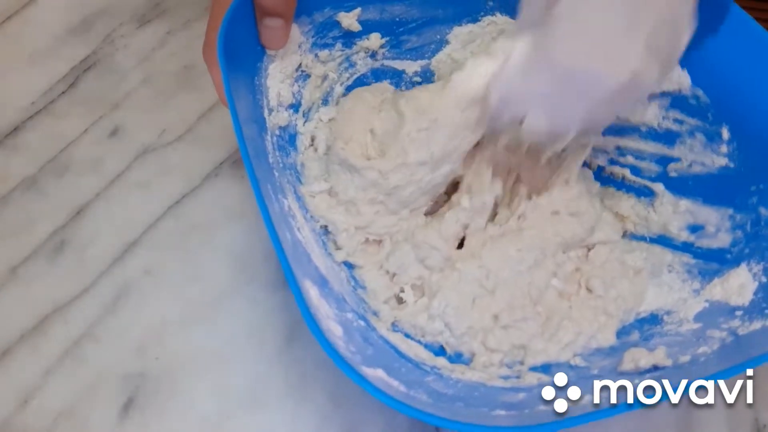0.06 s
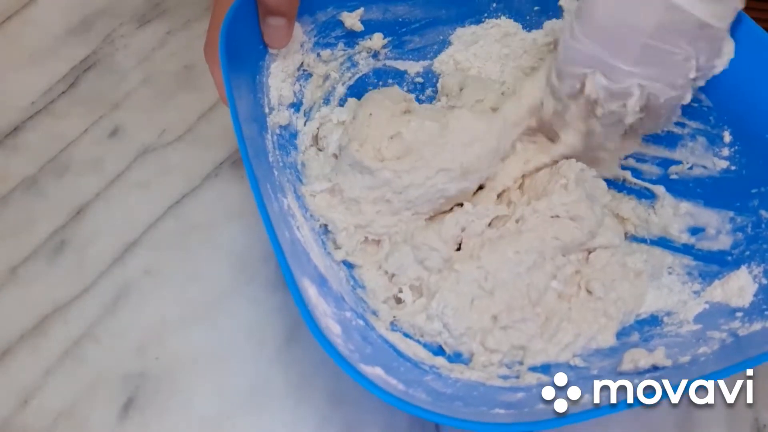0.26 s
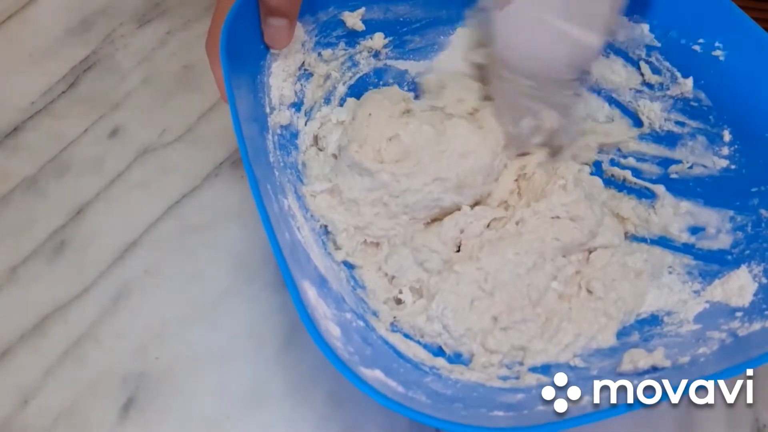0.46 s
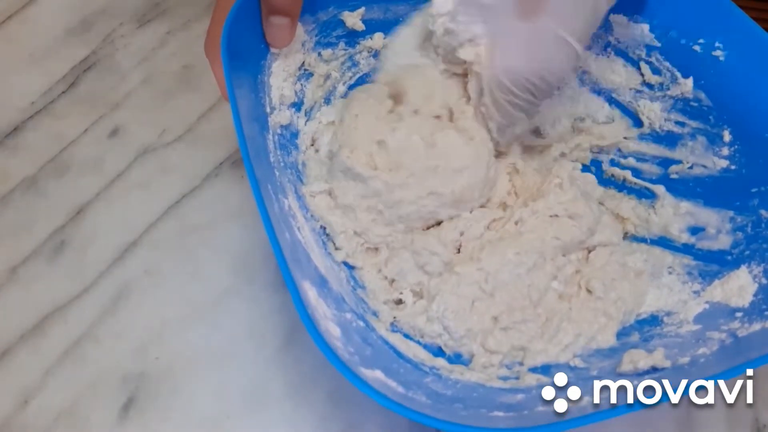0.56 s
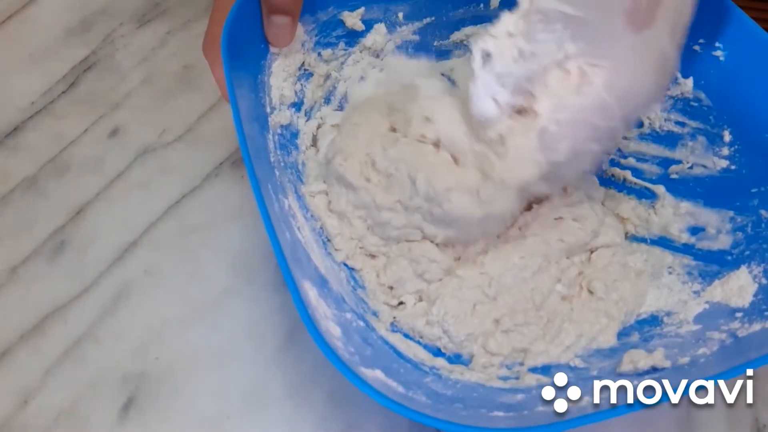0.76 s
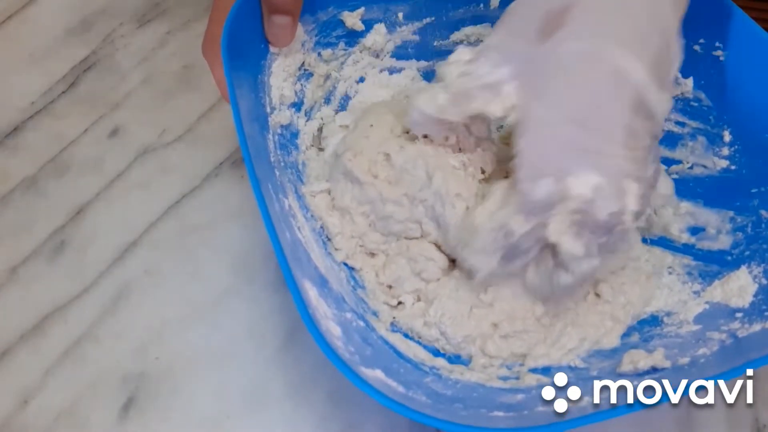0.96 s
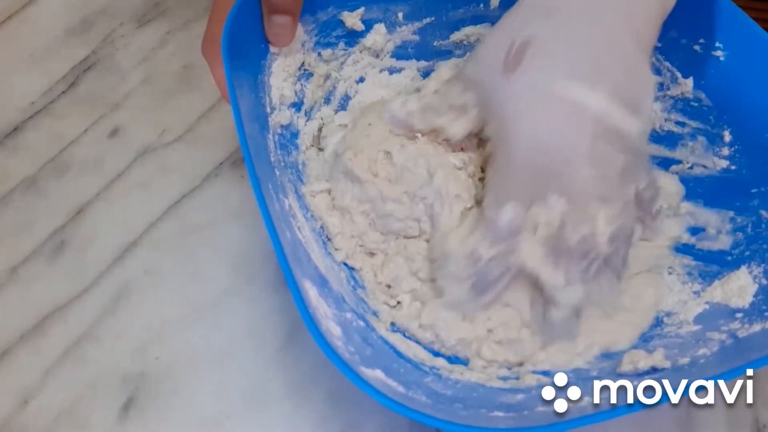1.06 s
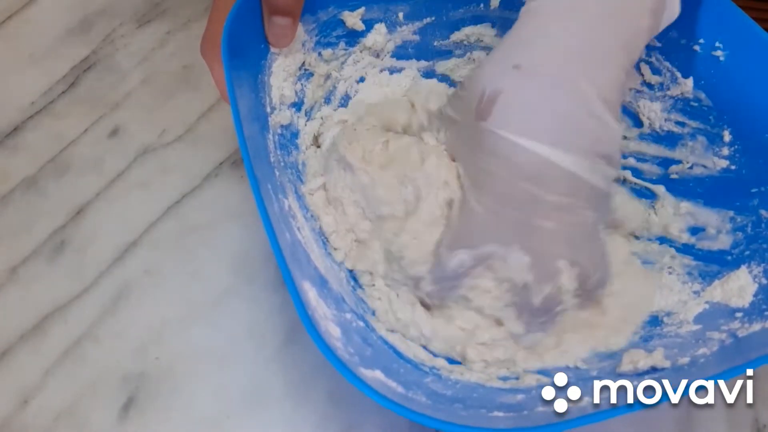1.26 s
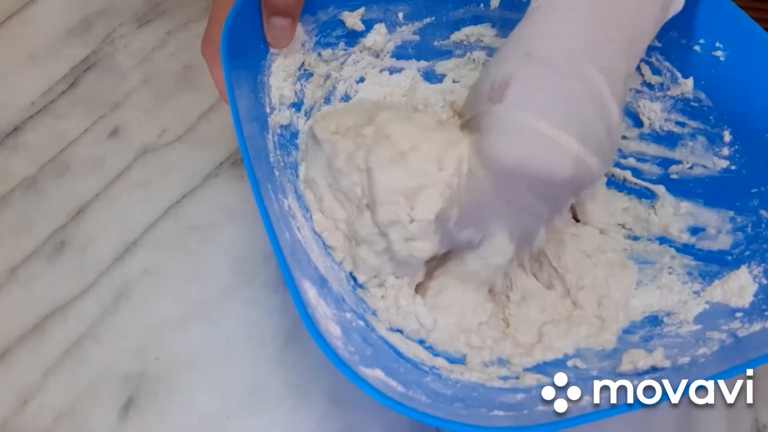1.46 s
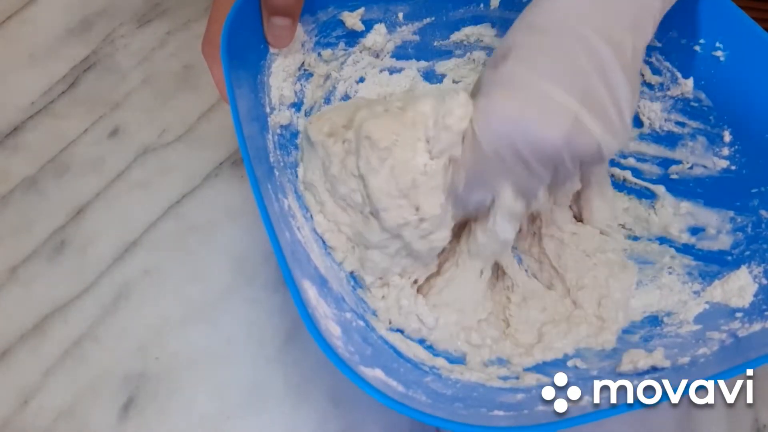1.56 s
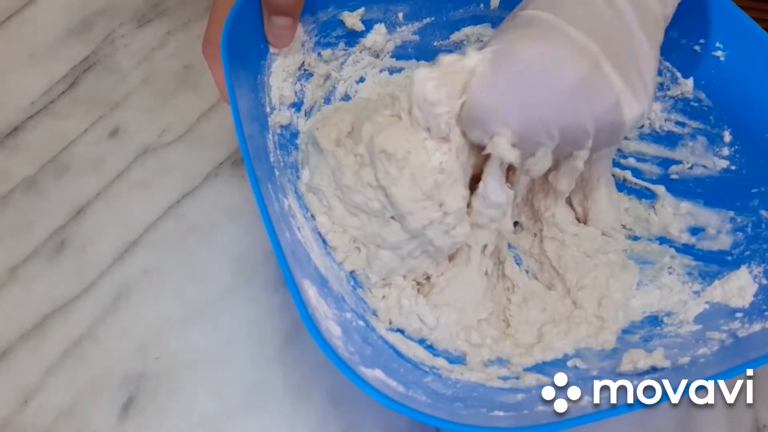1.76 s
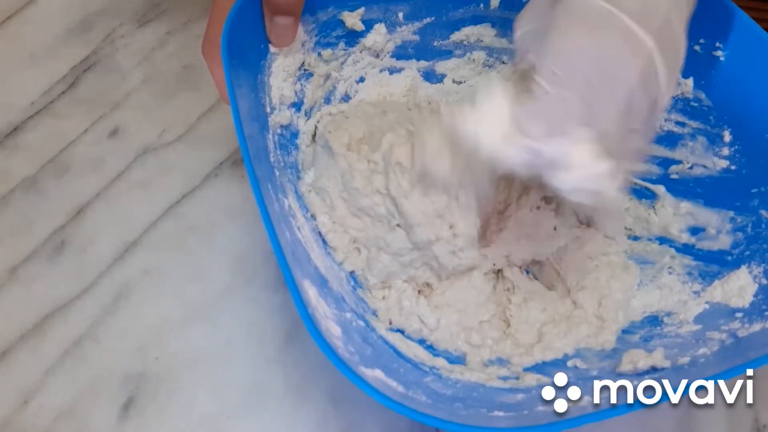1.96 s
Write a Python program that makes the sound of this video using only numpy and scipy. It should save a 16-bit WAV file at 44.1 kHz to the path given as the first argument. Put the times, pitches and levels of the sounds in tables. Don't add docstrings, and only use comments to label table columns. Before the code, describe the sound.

Sticky dough is kneaded close up in a plastic bowl, with quiet wet pulls, tiny ticks and thin glove rustle. At about 0.22 seconds the bowl raps the stone counter in a quick hollow double knock, rattles and is stilled by 0.35. Rubbing continues to 0.7; soft low stand bumps and very faint squeaks come around 0.8-1.2, then crisp sticky ticks from 1.4 to 1.9. A fan drones throughout.

```python
import sys
import numpy as np
from scipy import signal
from scipy.fft import rfft, irfft
from scipy.io import wavfile
from scipy.ndimage import uniform_filter1d

SR = 44100
rng = np.random.default_rng(int(sys.argv[2]) if len(sys.argv) > 2 else 0)


def volts_from_db(level):
    exponent = np.asarray(level, float) / 20
    return 10 ** exponent


def master_out(mix):
    frames = np.transpose(np.atleast_2d(mix))
    ceiling = np.clip(frames, -1, 1)
    pcm = np.round(ceiling * 32767).astype(np.int16)
    wavfile.write(sys.argv[1], SR, pcm)


N = 88200

# start_s, length_s, level_db
DOUGH_PULLS = [
    (0.02, 0.12, -63),
    (0.44, 0.33, -59.5),
    (1.421, .16, -55.5),
    (1.558, 0.15, -58.5),
    (1.843, 0.12, -59.5),
]
SQUISH_HZ, SQUISH_WIDTH_HZ, SQUISH_PER_S, SQUISH_GRAIN_DB = 3000, 6300, 640, 1.5

# start_s, level_db, centre_hz, width_hz, t60_s
STICKY_TICKS = [(0.025, -46, 5200, 3000, 0.028), (.070, -44, 14000, 5000, 0.0089),
                (.0695, -49, 7000, 6000, 0.0076), (.239, -45, 12000, 3000, 0.011),
                (.274, -44, 14000, 4000, .01), (0.302, -42, 2730, 2500, 0.056),
                (.332, -44, 11400, 6000, 0.023), (0.332, -46, 7500, 3500, .015),
                (0.376, -54, 1500, 1200, .012), (.410, -50, 14000, 3000, .01),
                (0.4575, -40, 1290, 1200, .015), (0.508, -45, 1490, 1200, 0.011),
                (.631, -41, 1700, 1200, .01), (0.561, -47, 5300, 3000, 0.0062),
                (.785, -57, 14500, 4000, 0.0095), (1.116, -50, 11100, 2500, 0.012),
                (1.181, -42.5, 13500, 6000, 0.0087), (1.322, -44, 14500, 4000, .006),
                (1.339, -43, 12000, 5000, 0.0088), (1.416, -47.5, 10900, 5000, 0.09),
                (1.449, -37.5, 2500, 3000, .006), (1.469, -41, 9000, 9000, 0.014),
                (1.472, -42, 4300, 2500, 0.012), (1.531, -48, 9000, 2500, 0.092),
                (1.542, -45, 3000, 3000, 0.01), (1.496, -52, 3000, 2500, .006),
                (1.509, -41, 2400, 1800, .006), (1.61, -48, 10500, 5000, .006),
                (1.643, -54, 12000, 6000, .02), (1.724, -42, 11500, 7000, 0.0072),
                (1.7243, -41, 3900, 2500, 0.0055), (1.769, -47, 7950, 5000, .006),
                (1.769, -39.5, 4230, 3500, 0.014), (1.787, -50, 13500, 4000, .008),
                (1.815, -52, 1920, 1500, .01), (1.8811, -38.5, 1900, 2200, 0.045)]
SNAP = 3.1

# time_s, level_db
GLOVE_RUB = [(0, -57.5), (.2, -62.5), (.33, -57.5), (.43, -62.5), (.5, -57), (.57, -55), (.66, -57.5),
             (.71, -66.5), (1.38, -69), (1.45, -62), (1.54, -66), (1.65, -63.5), (1.85, -65), (2, -66)]
# frequency_hz, density_db (per Hz)
RUSTLE_COLOUR = [(900, 7.5), (2000, -7), (4000, -10), (7300, -23), (8500, -10.5), (12000, -15.5),
                 (15900, -12.5)]
RUB_DB, RUB_GRAIN_DB, RUB_PER_S, RUB_PATCHY_DB = -1.5, 2.5, 2500, 1.2
# start_s, length_s, pitch_hz, level_db
GLOVE_SQUEAKS = [
    (.80, .09, 12150, -76),
    (.845, 0.045, 11600, -74),
    (.98, 0.12, 12200, -71),
    (1.005, .06, 11300, -72),
]
SQUEAK_WIDTH_HZ = 65

# start_s, strength_db, contact_ms
RIM_KNOCKS = [
    (.2213, -8.4, .51),
    (.2308, -10.6, 1.22),
    (.2506, -25, .25),
]
# start_s, strength_db, contact_ms
RIM_ROCKS = [
    (.272, -31, 2.3),
    (0.292, -40, 0.8),
    (0.31, -32, 2.5),
    (0.332, -41, 1),
]
# pitch_hz, level_db, t60_s
BOWL_MODES = [(160.8, -19.5, .36), (212, 8.9, .018), (275.5, 10, .064), (343.3, 4.3, .0425),
              (425.7, -7.4, .117), (510.2, -16.6, .24), (654, .4, .046), (697.7, -11.5, .22),
              (723.4, -11, .24), (909.5, -1, .0123), (1094, 2.2, .012), (1434, -13, .03), (1950, -18, .03),
              (1180, -8, .035)]
# start_s, pitch_hz, level_db, build_up_s
ROCKING_MODES = [
    (.225, 140, -32, 0.043),
    (.29, 283, -31, 0.017),
    (0.323, 278, -34, 0.023),
    (0.35, 520, -36, 0.017),
    (0.298, 528, -47, 0.027),
    (0.39, 435.2, -36, 0.037),
]
SLAP_DB, SLAP_FIRST_HZ, SLAP_LAST_HZ, SLAP_FALL_S, SLAP_PEAK_S = 7.45, 831, 150, .0041, .0022
SLIDE_S, SLIDE_DB, SLIDE_DULL_HZ = .258, -72.5, 426
SETTLE_S, SETTLE_FADE_S = .344, .006
CRACK_DB, CRACK_S, CRACK_HZ, CRACK_WIDTH_HZ, CRACK_SNAP = -31, 0.0007, 2800, 4500, 4
BASS_HZ = 90
KNOCK_PAN_DB, KNOCK_LAG_S = -0.5, -0.00021
CLATTER_DB, CLATTER_T60_S, CLATTER_HZ, CLATTER_WIDTH_HZ = -36.5, 0.36, 1500, 2000

# start_s, level_db, first_hz, last_hz, t60_s
STAND_NUDGES = [
    (0.8623, -28.5, 91, 47.7, 0.18),
    (0.899, -38.5, 33, 29.8, 0.47),
    (.967, -52, 30, 83, 0.35),
    (1.079, -31, 105, 34, 0.12),
    (1.125, -52, 40, 30, .3),
    (1.169, -42, 60, 34.7, .14),
    (1.526, -44, 61, 40, .2),
]
NUDGE_RISE_S, NUDGE_SLOW_S = .008, .017

# frequency_hz, t60_s
KITCHEN_DECAY = [(100, 0.11), (300, 0.51), (700, 0.52), (1500, 0.97), (4000, 0.098), (12000, 0.17)]
ROOM_DB = -15

# frequency_hz, density_db (per Hz)
DRONE_COLOUR = [(20, -42), (74, -56), (92, -7), (200, -7.5), (350, -10.5), (520, -6), (860, -6.5),
                (1150, -19)]
# frequency_hz, density_db (per Hz)
AIR_COLOUR = [(900, -38), (1300, -5.5), (2100, -8.5), (4100, -16), (7300, -24.5), (8500, -22.5),
              (12000, -24), (15900, -29)]
DRONE_DB, AIR_DB = -45, -54
# centre_hz, width_hz, gain_db
FAN_ROOM_LUMPS = [(128, 18, 2), (204.5, 51, 5.5), (236, 67, 6.5), (301, 61, 7), (396, 27, 10),
                  (158.5, 32, -4), (731, 200, 7.5), (1814, 206, 5), (2140, 160, 5), (3050, 160, 3.5)]
# time_s, gain_db
DRONE_SWELL = [(0, 4.5), (.2, 6), (.5, 4), (.7, 2), (.9, 0), (1.2, -2), (1.5, -1.5), (1.75, -1.5), (2, 3)]
HUM_HZ, HUM_DB = 48.7, -57
# pitch_hz, level_db
WAVERING_LINES = [(132, -57), (187, -57.5), (201, -57.5), (234, -54), (281, -53.5), (529, -61.5), (717, -68),
                  (1179, -70), (1572, -83)]
# pitch_hz, level_db
HUM_OVERTONES = [(97.5, -58), (295, -58), (393.5, -60), (494.5, -60), (742, -58), (990.6, -69), (1485, -75)]
WHINE_WIDTH_HZ, OVERTONE_WIDTH_HZ = 5.6, .3

# frequency_hz, correlation (-1 to 1)
STEREO_LIKENESS = [(60, 0.75), (180, 1), (350, 0.5), (600, 0.062), (1400, -0.16), (15000, 0.0049)]
# frequency_hz, left_minus_right_db
MICROPHONE_TILT = [(60, -1), (250, -1.5), (700, -2), (2400, -2.5), (8000, -0.5), (13000, -3)]
EDGE_HZ = 15850


def evened(x):
    return x / np.sqrt(np.mean(x ** 2) + 1e-20)


def read(points, hz):
    f, value = np.transpose(points)
    return np.interp(np.log(hz + 1), np.log(f + 1), value)


def curve(points, t):
    return np.interp(t, *np.transpose(points))


def add(mix, start_s, sound):
    part = mix[..., round(start_s * SR):][..., :sound.shape[-1]]
    part += sound[..., :part.shape[-1]]


def resonate(x, hz, width_hz):
    turn = np.exp(2j * np.pi * hz * np.arange(x.shape[-1]) / SR)
    r = np.exp(-np.pi * width_hz / SR)
    return 2 * (turn * signal.lfilter([1 - r], [1, -r], x / turn)).real


def resonate_twice(x, hz, width_hz):
    return resonate(resonate(x, hz, width_hz), hz, width_hz)


def alike(left, right, hz):
    same = np.clip(read(STEREO_LIKENESS, hz), -1, 1)[:, None]
    return np.array([left, same * left + np.sqrt(1 - same ** 2) * right])


def grains(per_s, spread_db):
    size = volts_from_db(spread_db * np.minimum(rng.exponential(1, N), 5))
    return size * (rng.random(N) < per_s / SR)


def noise(shape, patchy_db):
    frames, hz = N // 512 + 5, np.fft.rfftfreq(2048, 1 / SR)
    a, b, c, d, patches = rng.standard_normal((frames, 1025, 5)).T
    patches = uniform_filter1d(patches, size=14, axis=0)
    patches = evened(uniform_filter1d(patches, size=5, axis=1))
    z = alike(a + 1j * b, c + 1j * d, hz)
    lump_db = sum(db / (1 + ((hz - f) / (w / 2)) ** 2) for f, w, db in FAN_ROOM_LUMPS)
    outside = (hz < shape[0][0]) | (hz > shape[-1][0])
    shape_db = np.where(outside, -100, read(shape, hz) + lump_db)
    z = z * volts_from_db(shape_db[:, None] + patchy_db * patches)
    return evened(signal.istft(z, nperseg=2048, noverlap=1536)[1][:, :N])


def squish():
    t = np.arange(N) / SR
    level = np.zeros(N)
    for start_s, length_s, db in DOUGH_PULLS:
        level += volts_from_db(db) * np.sin(np.pi * np.clip((t - start_s) / length_s, 0, 1)) ** .5
    bursts = grains(SQUISH_PER_S, SQUISH_GRAIN_DB)
    power = signal.lfilter([1], [1, -.97], bursts ** 2) + 0.52
    pops = np.sqrt(power) * rng.standard_normal((2, N))
    return level * evened(resonate_twice(pops, SQUISH_HZ, SQUISH_WIDTH_HZ))


def ticks():
    out, t = np.zeros((2, N)), np.arange(2500) / SR
    for start_s, db, hz, width_hz, t60_s in STICKY_TICKS:
        z = rng.standard_normal((2, 2500))
        burst = (z + 0.23 * z[::-1] + SNAP * (t == 0)) * volts_from_db(-60 * t / t60_s)
        band = resonate_twice(burst, hz, width_hz)
        add(out, start_s, volts_from_db(db) * band / abs(band).max())
    return out


def glove():
    t = np.arange(N) / SR
    creases = grains(RUB_PER_S, RUB_GRAIN_DB)
    crackle = np.sqrt(uniform_filter1d(creases ** 2, size=40) + 1e-9)
    rustle = evened(crackle * noise(RUSTLE_COLOUR, RUB_PATCHY_DB))
    level = volts_from_db(curve(GLOVE_RUB, t))
    rubbing = np.sqrt(np.maximum(level ** 2 - level.min() ** 2, 0))
    out = 2 * volts_from_db(RUB_DB) * rubbing * rustle
    for start_s, length_s, hz, db in GLOVE_SQUEAKS:
        squeak = evened(resonate(rng.standard_normal((2, SR // 5)), hz, SQUEAK_WIDTH_HZ))
        swell = np.sin(np.pi * np.clip(t[:SR // 5] / length_s, 0, 1))
        add(out, start_s, volts_from_db(db) * squeak * swell)
    return out


def bowl_blows():
    blows, t = np.zeros(N), np.arange(300) / SR
    for start_s, db, contact_ms in [*RIM_KNOCKS, *RIM_ROCKS]:
        push = np.sin(np.pi * np.clip(t / (contact_ms / 1000), 0, 1))
        add(blows, start_s, volts_from_db(db) * push / push.sum())
    dull = signal.butter(2, SLIDE_DULL_HZ, fs=SR)
    judder = evened(signal.lfilter(*dull, rng.standard_normal(SR // 5)))
    add(blows, SLIDE_S, volts_from_db(SLIDE_DB) * judder)
    return blows


def bowl_response():
    t = np.arange(SR // 2) / SR
    ring = np.zeros(len(t))
    for k, (hz, db, t60_s) in enumerate(BOWL_MODES):
        ring += (-1) ** k * volts_from_db(db - 60 * t / t60_s) * np.sin(2 * np.pi * hz * t)
    slap_hz = SLAP_LAST_HZ + (SLAP_FIRST_HZ - SLAP_LAST_HZ) * np.exp(-t / SLAP_FALL_S)
    u = t / SLAP_PEAK_S
    slap = volts_from_db(SLAP_DB) * u * np.exp(1 - u) * np.sin(2 * np.pi * np.cumsum(slap_hz) / SR)
    return ring + slap


def knock():
    t = np.arange(SR // 2) / SR
    out = signal.oaconvolve(bowl_blows(), bowl_response())[:N] * .5
    for start_s, hz, db, build_s in ROCKING_MODES:
        swell = t / build_s * np.exp(1 - t / build_s)
        add(out, start_s, volts_from_db(db) * swell * np.sin(2 * np.pi * hz * t))
    out *= np.exp(-np.maximum(np.arange(N) / SR - SETTLE_S, 0) / SETTLE_FADE_S)
    t = t[:600]
    crack = resonate(rng.standard_normal(600) + CRACK_SNAP * (t == 0), CRACK_HZ, CRACK_WIDTH_HZ)
    add(out, RIM_KNOCKS[0][0], volts_from_db(CRACK_DB) * np.exp(-t / CRACK_S) * crack)
    return signal.sosfilt(signal.butter(2, BASS_HZ, "high", fs=SR, output="sos"), out)


def clatter():
    out, t = np.zeros((2, N)), np.arange(SR // 2) / SR
    shiver = evened(resonate_twice(rng.standard_normal((2, SR // 2)), CLATTER_HZ, CLATTER_WIDTH_HZ))
    add(out, RIM_KNOCKS[0][0], shiver * volts_from_db(CLATTER_DB - 60 * t / CLATTER_T60_S))
    return out


def nudges():
    out, t = np.zeros(N), np.arange(SR // 3) / SR
    for start_s, db, first_hz, last_hz, t60_s in STAND_NUDGES:
        hz = last_hz + (first_hz - last_hz) * np.exp(-t / NUDGE_SLOW_S)
        level = volts_from_db(db - 60 * t / t60_s) * np.minimum(t / NUDGE_RISE_S, 1)
        add(out, start_s, level * np.sin(2 * np.pi * np.cumsum(hz) / SR))
    return out


def room(x):
    taps = np.zeros((2, SR))
    at = np.arange(200, SR - 20, 20)
    at = at + rng.integers(0, 20, (2, len(at)))
    np.put_along_axis(taps, at, rng.choice([-1., 1.], at.shape), 1)
    hz, t, z = signal.stft(taps, SR, nperseg=512)
    decay = volts_from_db(-60 * t / read(KITCHEN_DECAY, hz)[:, None])
    tail = signal.istft(alike(z[0], z[1], hz) * decay, SR, nperseg=512)[1]
    return signal.fftconvolve(x[None], tail / np.linalg.norm(tail[0]), axes=1)[:, :N]


def kitchen_air():
    t = np.arange(N) / SR
    swell_db = curve(DRONE_SWELL, t)
    drone = volts_from_db(DRONE_DB + swell_db) * noise(DRONE_COLOUR, patchy_db=0.5)
    hiss = volts_from_db(AIR_DB + 0.26 * swell_db) * noise(AIR_COLOUR, patchy_db=2.5)
    hum = volts_from_db(HUM_DB) * np.sqrt(2) * np.sin(2 * np.pi * HUM_HZ * t)
    return drone + hiss + hum


def whines():
    lines = [(hz, db, WHINE_WIDTH_HZ) for hz, db in WAVERING_LINES]
    lines += [(hz, db, OVERTONE_WIDTH_HZ) for hz, db in HUM_OVERTONES]
    out = np.zeros((2, N))
    for hz, db, width_hz in lines:
        z = rng.standard_normal((2, 2 * N))
        tone = resonate(z + 0.42 * z[::-1], hz, width_hz)[:, N:]
        out += volts_from_db(db) * evened(tone)
    return out


def scene():
    bowl = knock()
    left = np.roll(bowl, round(KNOCK_LAG_S * SR)) * volts_from_db(KNOCK_PAN_DB / 2)
    right = bowl * volts_from_db(-KNOCK_PAN_DB / 2)
    hand = squish() + ticks() + glove()
    counter = np.array([left, right]) + volts_from_db(ROOM_DB) * room(bowl) + clatter() + nudges()
    return hand + counter + kitchen_air() + whines()


def band_limit(x):
    return signal.sosfilt(signal.butter(12, 15860, fs=SR, output="sos"), x)


def record(dry):
    hz = np.fft.rfftfreq(N, 1 / SR)
    tilt_db = read(MICROPHONE_TILT, hz) / 2
    colour = volts_from_db(np.array([tilt_db, -tilt_db])) * (hz < EDGE_HZ)
    mix = irfft(rfft(dry) * colour, N)
    return band_limit(mix)


dry = scene()
out = record(dry)
master_out(out)
```